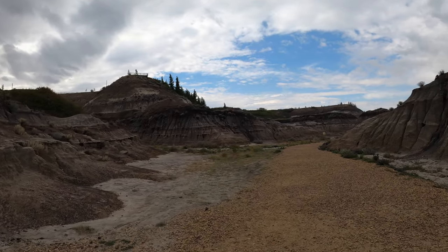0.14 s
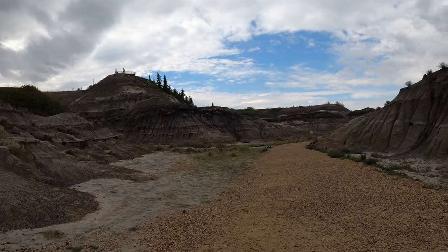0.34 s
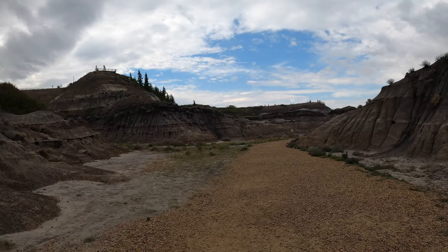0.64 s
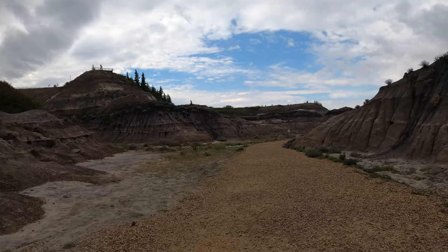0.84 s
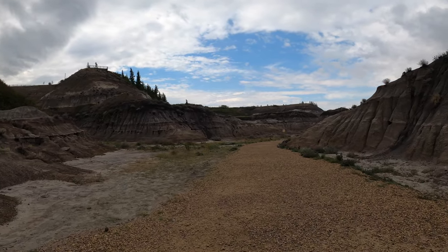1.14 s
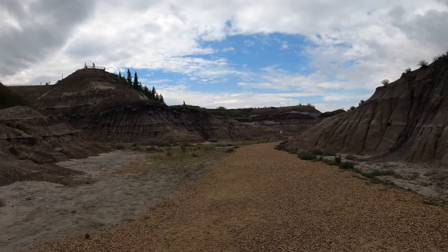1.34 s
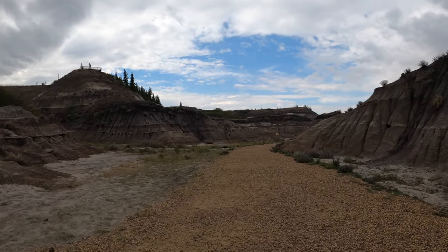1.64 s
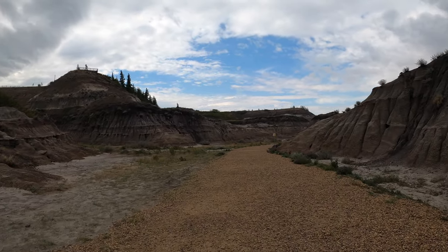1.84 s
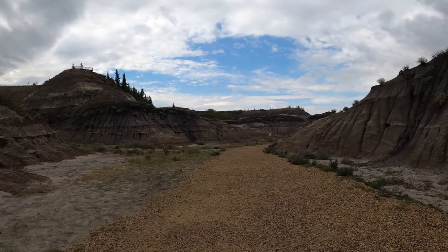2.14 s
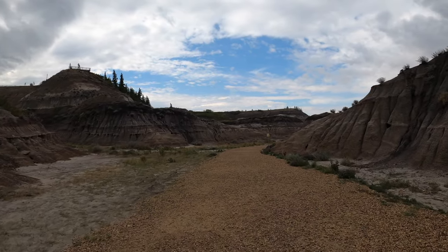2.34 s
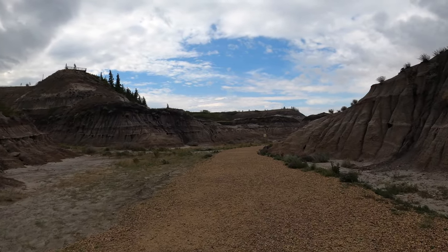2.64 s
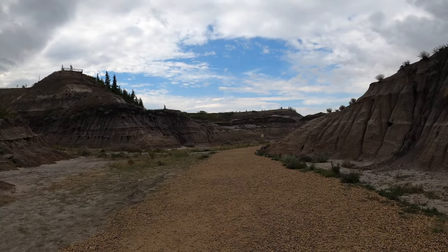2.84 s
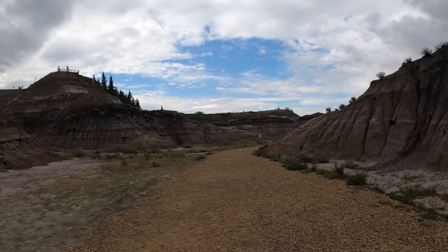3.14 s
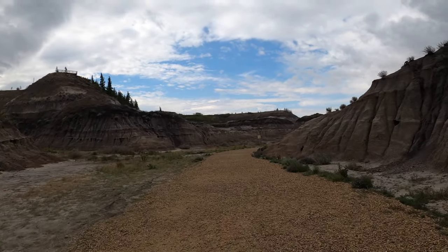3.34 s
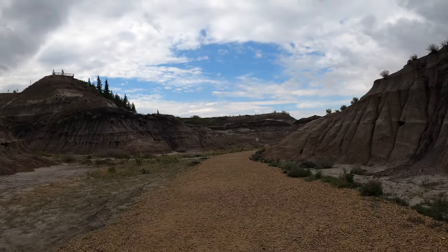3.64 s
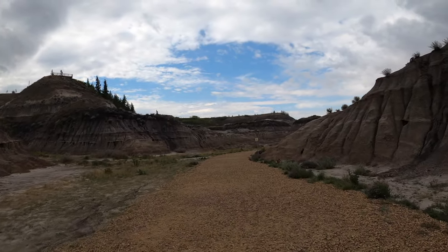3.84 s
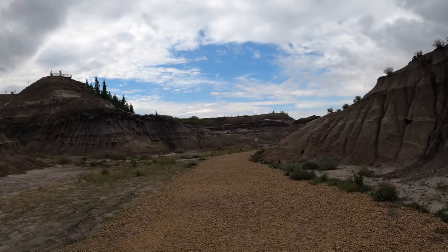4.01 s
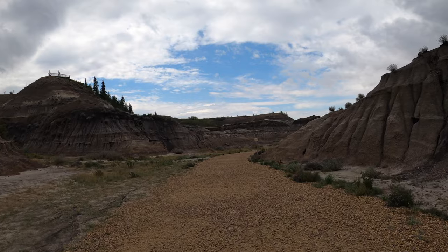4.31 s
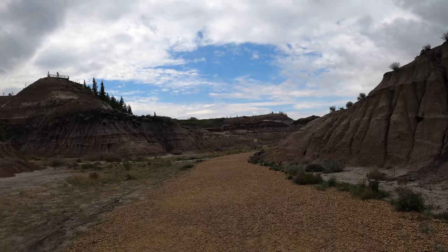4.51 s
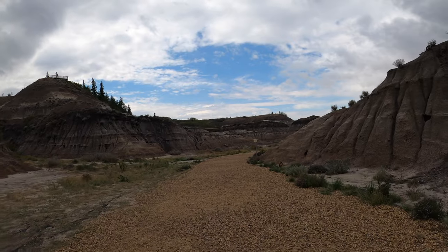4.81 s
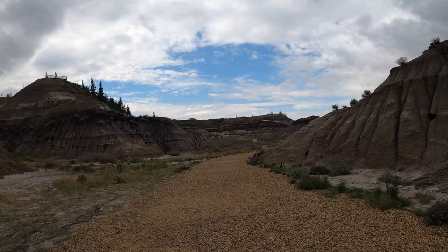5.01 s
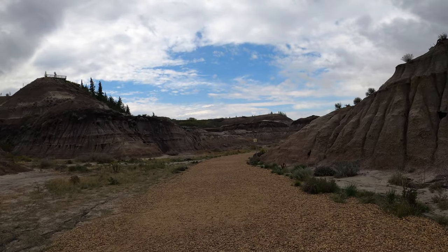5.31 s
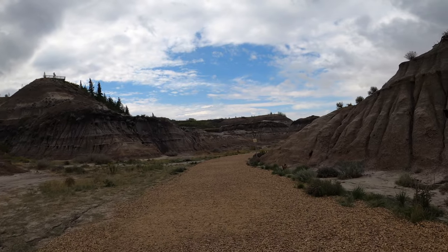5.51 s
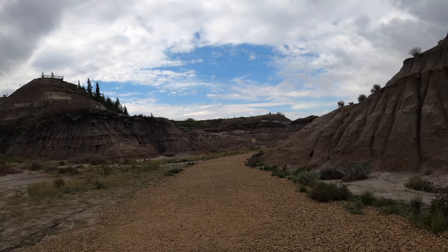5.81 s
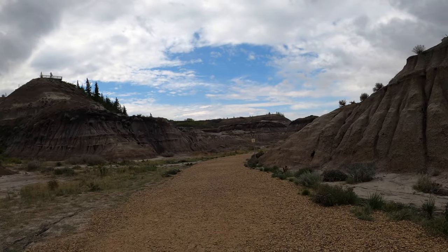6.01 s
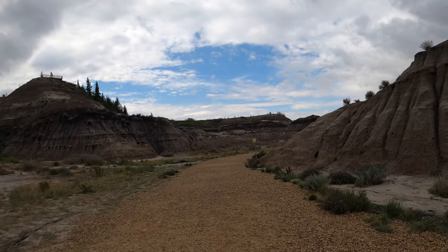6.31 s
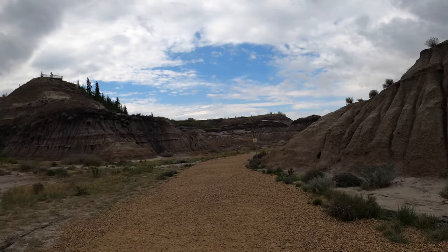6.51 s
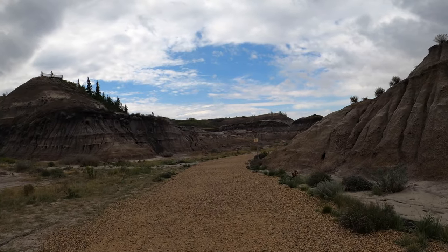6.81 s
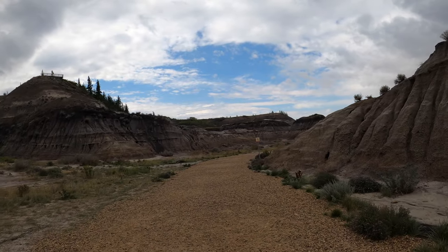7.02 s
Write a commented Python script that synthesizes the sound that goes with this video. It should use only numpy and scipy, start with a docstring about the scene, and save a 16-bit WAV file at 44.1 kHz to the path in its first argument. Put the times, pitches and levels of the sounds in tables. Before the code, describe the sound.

One walker treads a gravel path at an even pace, each step crisp and crunchy, over deep buffeting wind rumble and faint pebble ticks.

```python
"""Someone walks at a steady pace along a gravel trail in an open canyon, carrying the microphone.
From the start, wind noise rumbles in gusts on the microphone port and loose gravel ticks faintly.
Each step crushes the gravel (noise shaped by random touches) and stones snap (short damped knocks and cracks).
Between the steps the other sole scuffs off fine grit (swishing noise); later, hard chips clink (ringing tones).
There are no walls near enough to echo."""
import sys
import numpy as np
from scipy import signal
from scipy.io import wavfile
from scipy.ndimage import uniform_filter1d

SR = 44100
rng = np.random.default_rng(int(sys.argv[2]) if len(sys.argv) > 2 else 0)


def dump(signal):
    """Clip the signal to [-1, 1] and save it as 16-bit WAV at the path in sys.argv[1]."""
    limited = np.clip(np.atleast_2d(signal).T, -1, 1)
    pcm = np.round(limited * 32767).astype(np.int16)
    wavfile.write(sys.argv[1], SR, pcm)


N = 315756
TIME = np.arange(N) / SR

# footfalls, with relative levels: full_weight_s [s], fade_s [s], packed_ground_db [dB], pebbles_db [dB],
# grit_db [dB], loose_gravel_stir_db [dB]
FOOTFALLS = [(0.071, 0.075, -56, -36, -46.5, -59.5), (0.602, 0.07, -50, -38, -53, -62.5),
             (1.12, 0.044, -43.5, -31.5, -46.5, -60.5), (1.636, 0.042, -51, -36.5, -46, -56),
             (2.148, 0.038, -43.5, -33.5, -41, -57.5), (2.66, .11, -50.5, -38.5, -47.5, -60),
             (3.208, 0.037, -41, -27.5, -40, -58.5), (3.722, 0.033, -43, -30, -38, -55),
             (4.237, 0.053, -46.5, -32.5, -45.5, -60.5), (4.759, 0.051, -47, -36, -44.5, -58),
             (5.281, 0.048, -41, -34.5, -43.5, -55), (5.801, 0.031, -48.5, -34.5, -42.5, -58),
             (6.272, 0.067, -46, -36.5, -48, -58), (6.815, 0.055, -45, -32.5, -43, -54)]


def from_db(db):
    """Turn decibels into gain."""
    return 10 ** (np.asarray(db) / 20)


def rms_one(x):
    """Scale to unit power."""
    return x / np.sqrt(np.mean(x ** 2) + 1e-20)


def band(x, low, high, order=2):
    """Keep only the pitches between low and high, in Hz."""
    sos = signal.butter(order, [low, min(high, .45 * SR)], "band", fs=SR, output="sos")
    return signal.sosfilt(sos, x + 1e-18)


def hiss():
    """White noise."""
    return rng.standard_normal(N)


def drift(rate):
    """Wander in straight lines between random values, rate of them a second, with rms 1."""
    return rms_one(np.interp(TIME * rate, np.arange(N), rng.standard_normal(N)))


def swell(s, half_s, db):
    """Gain that peaks at time s and is 10 dB down half_s either side."""
    return from_db(db - 10 * np.minimum(((TIME - s) / half_s) ** 2, 20))


def steady(x, span_s):
    """Even out slow swells, keep the fine grain."""
    power = np.abs(uniform_filter1d(x ** 2, max(int(span_s * SR), 2)))
    return x / np.sqrt(power + 1e-12)


def coloured(excite, spectrum, low, high):
    """Add up half-octave bands, each with a fresh excitation and the spectrum's level; rms 1."""
    hz, db = np.transpose(spectrum)
    edges = np.geomspace(low, high, round(2 * np.log2(high / low)) + 1)
    middle_log_hz = np.log(edges[1:] * edges[:-1]) / 2
    gains = from_db(np.interp(middle_log_hz, np.log(hz), db))
    bands = (g * band(excite(), a, b, order=3) for g, a, b in zip(gains, edges, edges[1:]))
    return rms_one(sum(bands))


def touches(per_s, spread_db):
    """Stones touch at random, many lightly, a few hard."""
    sizes = from_db(spread_db * np.minimum(rng.exponential(1, N), 3.5))
    return steady(sizes * (rng.random(N) < per_s / SR), 0.039)


def contacts(per_s, spread_db, rub, own):
    """Some touches sound in every band, others only at their own stone's pitch, over a smooth rub."""
    shared = touches(per_s, spread_db)
    return lambda: (shared + own * touches(per_s / 2, spread_db) + rub) * hiss()


def wind():
    """Gusts strike the port, hold and ease off: eddies rumble, buffet and thud; faint air hiss lies behind."""
    # gusts on the port: start_s [s], end_s [s], rumble_db [dB], buffeting_db [dB], hollow_rush_db [dB]
    gust_rows = [(0.014, 0.244, -31.5, -42, -72), (0.374, 0.718, -27.5, -39, -74),
                 (0.84, 1.108, -32.5, -49, -78), (1.46, 1.756, -35, -50.5, -75),
                 (2.181, 2.55, -34, -48.5, -71), (3.325, 3.87, -27.5, -43, -63),
                 (3.985, 4.52, -37, -51, -74), (4.652, 5.512, -27, -40.5, -69),
                 (5.663, 5.786, -29, -47, -67), (6.134, 6.71, -30.5, -45.5, -60),
                 (6.79, 7.2, -31.5, -47, -65)]
    # breeze between gusts: rumble_db [dB], buffeting_db [dB], hollow_rush_db [dB]
    breeze_db = (-41.5, -54.5, -73)
    # single eddies thudding on the port: peak_s [s], level_db [dB]
    thud_rows = [(0.172, -31.5), (0.23, -33), (0.42, -32), (0.69, -34.5), (0.885, -32), (1.61, -39.5),
                 (2.21, -37), (2.875, -41.5), (3.55, -29), (5.1, -32.5), (5.235, -29.5), (5.477, -24.5),
                 (6.137, -30)]
    # colours of the rumble, the buffeting and the air hiss: pitch_hz [Hz], level_db [dB per Hz]
    rumble_colour = [(12, 4), (20, 1), (32, 3), (50, -2), (75, -6), (100, -11.5)]
    buffet_colour = [(80, 1), (110, 4.5), (160, -6.5), (220, -14.5), (300, -26), (420, -33.5)]
    air_colour = [(200, 16), (300, 5), (500, -3), (800, -5.5), (1300, 1.5), (2500, -6.5), (5000, -11.5),
                  (7500, -17), (10500, -22.5), (14000, -63)]
    attack_s, release_s = 0.02, 0.082  # to rise or fall by 10 dB
    thud_half_s = 0.019
    eddies_per_s, rumble_swing_db, buffet_swing_db = 24, 2, 4

    level_db = np.array(breeze_db)[:, None]
    for start, end, *peak_db in gust_rows:
        before = np.maximum(start - TIME, 0) / attack_s
        after = np.maximum(TIME - end, 0) / release_s
        gust_db = np.array(peak_db)[:, None] - 10 * (before + after)
        level_db = np.maximum(level_db, gust_db)
    rumble_db, buffet_db, rush_db = level_db

    eddies = drift(eddies_per_s)
    thuds = sum(swell(s, thud_half_s, db) for s, db in thud_rows)
    rumble_gain = from_db(rumble_db + rumble_swing_db * eddies)
    rumble = rumble_gain * steady(coloured(hiss, rumble_colour, 13, 94.57), 0.0696)
    buffet_gain = np.hypot(from_db(buffet_db + buffet_swing_db * eddies), thuds)
    buffet = buffet_gain * steady(coloured(hiss, buffet_colour, 86.6, 453), 0.0482)
    rush = from_db(rush_db) * rms_one(band(hiss(), 292, 525, order=3))
    air = from_db(-59.0) * coloured(hiss, air_colour, 177.4, 13300)
    return rumble + buffet + rush + air


def loose_gravel():
    """Small ticks come in uneven trickles as the foot rolls before and after each footfall."""
    # two stirs in every step: after_full_weight_s [s], half_length_s [s], level_db [dB above the step's stir]
    roll = [(-.12, 0.091, -2.5), (0.167, 0.12, 0.5)]
    # colour of the ticks: pitch_hz [Hz], level_db [dB per Hz]
    tick_colour = [(300, -2.5), (600, -3), (850, -7), (1300, 2.5), (1900, -1.5), (2900, -8), (4000, -14.5),
                   (6000, -19), (9000, -29), (12000, -62)]
    resting_db, trickle_swing_db, trickles_per_s = -68, 3, 28

    stir_power = sum(swell(s + lag, half, stir_db + db) ** 2
                     for s, *_, stir_db in FOOTFALLS for lag, half, db in roll)
    ticks = coloured(contacts(per_s=300, spread_db=2.5, rub=.25, own=1.36), tick_colour, 273, 12600)
    trickle = from_db(trickle_swing_db * drift(trickles_per_s))
    return np.sqrt(stir_power + from_db(resting_db) ** 2) * trickle * ticks


def footsteps():
    """Weight builds and eases; fine grit gives way first, then pebbles and the packed ground."""
    # colour of the crunch: pitch_hz [Hz], level_db [dB per Hz]
    crunch_colour = [(200, -3.5), (400, -4.5), (600, -7), (850, -8.5), (1150, -6), (1500, -10.5),
                     (2100, -7), (2900, -5), (5000, -22), (7000, -27), (8700, -28.5), (11000, -43),
                     (14500, -48)]
    build_s = 0.034  # the weight comes onto the foot: the last 10 dB of the rise

    coarse = contacts(per_s=500, spread_db=4.5, rub=0.16, own=0.9)
    fine = contacts(per_s=700, spread_db=7.5, rub=0.53, own=0.92)
    ground = from_db(2.5) * coloured(coarse, crunch_colour, 168.3, 797)
    pebbles = from_db(-6.0) * coloured(coarse, crunch_colour, 816, 1940)
    grit = from_db(-3.5) * coloured(fine, crunch_colour, 2120, 15800)
    out = np.zeros(N)
    for s, fade, ground_db, pebble_db, grit_db, _ in FOOTFALLS:
        near = np.abs(TIME - s) < .25
        for layer, db, lead_s in [(ground, ground_db, 0), (pebbles, pebble_db, 0), (grit, grit_db, .004)]:
            t = TIME[near] - s + lead_s
            weight_db = -10 * np.abs(t / np.where(t < 0, build_s, fade)) ** 1.5
            out[near] += from_db(db + weight_db) * layer[near]
    return out


def slips():
    """Lesser stones give way at random moments around each footfall: rows like those in stones()."""
    per_step = 7
    lag_s, scatter_s = .006, .055
    knock_db, crack_db, spread_db = 3.5, -1, 3  # knock and crack relative to the step's pebbles
    middle_hz, spread_octaves = 1345, 0.26

    steps = [(step[0], step[3]) for step in FOOTFALLS]
    s, pebble_db = np.repeat(steps, per_step, axis=0).T
    when, knock, size, crack = rng.standard_normal((len(s), 4)).T
    slip_s = np.clip(s + lag_s + scatter_s * np.tanh(when), FOOTFALLS[0][0] / 2, TIME[-1])
    return list(zip(slip_s,
                    pebble_db + knock_db + spread_db * knock,
                    middle_hz * 2 ** (spread_octaves * size),
                    pebble_db + crack_db + spread_db * crack))


def stones():
    """A stone grinds briefly, then slips: a crack and a knock of two or three cycles, damped by the gravel bed."""
    # single stones snapping, with relative levels: slip_s [s], knock_db [dB], knock_hz [Hz], crack_db [dB]
    snap_rows = [(0.0659, -15, 1040, -32), (0.0772, -19, 1120, -50), (0.1665, -22, 1530, -55),
                 (0.5778, -31, 1600, -27), (0.7116, -31, 1640, -50), (1.0842, -24.5, 990, -40),
                 (1.1178, -16, 1140, -45), (1.2272, -26, 1210, -33.5), (1.3305, -29, 1190, -55),
                 (1.6116, -26, 1530, -26.5), (1.648, -17.5, 1420, -50), (1.6942, -22.5, 1410, -48),
                 (1.7477, -21.5, 1320, -36), (1.7739, -22.5, 1350, -50), (1.9846, -27, 1410, -55),
                 (2.124, -16, 860, -31), (2.1485, -17.5, 880, -27), (2.2973, -30, 1220, -43),
                 (2.7552, -24, 1290, -41), (3.0267, -26, 1590, -55), (3.0894, -23, 1860, -30),
                 (3.1, -41, 2070, -32), (3.1708, -24, 1430, -34), (3.2093, -6, 930, -24),
                 (3.217, -5.5, 1170, -34), (3.2404, -1, 1120, -38), (3.2474, -9, 1040, -43),
                 (3.4877, -29, 1010, -55), (3.844, -24, 1280, -55), (4.0515, -26, 1480, -47),
                 (4.231, -18, 1280, -42), (4.243, -14, 1610, -44), (4.5912, -32, 1800, -43),
                 (4.7612, -17.5, 1460, -21), (5.0525, -26.5, 1820, -32), (5.108, -12, 1700, -27.5),
                 (5.2611, -19.5, 1240, -39), (5.2809, -20, 1140, -21.5), (5.7946, -15, 1360, -45),
                 (5.8142, -14.5, 1160, -28), (6.7135, -47, 1390, -28), (6.8389, -14, 1400, -43),
                 (6.8661, -8, 1210, -27.5), (6.8836, -17, 1290, -31)]

    out = np.zeros(N + SR)
    t = np.arange(-400, 800) / SR
    for s, knock_db, hz, crack_db in [*snap_rows, *slips()]:
        chatter, size = rng.standard_normal((2, len(t))), rng.standard_normal()
        jostle = np.exp(-np.abs(t) / np.where(t < 0, .0025, .004))  # neighbours rub before and after the slip

        cycles = hz * t[t >= 0]
        ring = cycles ** 2 * np.exp(-cycles / .36) * np.cos(2 * np.pi * cycles)
        strike = (t == 0) + 0.032 * chatter[0] * jostle
        knock = band(np.convolve(strike, ring)[:len(t)], 290, 8100)

        crack_hz = 3600 * np.exp(0.13 * size)
        burst = chatter[1] * (np.exp(-np.abs(t - .0003) / 0.0003) + 0.35 * jostle)
        crack = band(burst, crack_hz * .6, crack_hz * 1.5, order=3)

        at = int((s + t[0]) * SR)
        out[at:at + len(t)] += from_db(knock_db - 3.5) * knock / np.abs(knock).max()
        out[at:at + len(t)] += from_db(crack_db - 8.0) * crack / np.abs(crack).max()
    return out[:N]


def scuffs():
    """The sole slides over fine grit: a short swish, with a bright rasp pitched a little differently each time."""
    # a sole scuffing as it pushes off or skids: peak_s [s], relative level_db [dB], rasp_hz [Hz]
    scuff_rows = [(0.256, -51, 4800), (0.764, -48.5, 5240), (1.322, -58, 6800), (1.806, -49.5, 6250),
                  (2.344, -48, 4200), (2.833, -52, 4670), (3.383, -48, 4700), (3.711, -42, 5200),
                  (3.882, -52.5, 5570), (4.417, -50.5, 4600), (4.915, -53, 4300), (5.456, -53.5, 5500),
                  (5.946, -49, 4500), (6.486, -46, 4900), (6.987, -49, 5300)]
    # colour of the swish: pitch_hz [Hz], level_db [dB per Hz]
    swish_colour = [(700, 7), (1400, 8.5), (2500, 2.5), (4000, 6.5), (5300, -0.5), (7000, -4),
                    (8700, -10.5), (11000, -29), (14000, -27)]
    half_s = 0.024  # 10 dB below the peak this long before and after it
    rasp_quality, rasp_db = 3.4, -6  # narrowness of the rasp; its level against the swish

    swish = coloured(contacts(per_s=4600, spread_db=4.0, rub=0.81, own=1.0), swish_colour, 730, 14350)
    out = np.zeros(N)
    for s, db, hz in scuff_rows:
        near = np.abs(TIME - s) < .2
        low, high = hz * (1 - .5 / rasp_quality), hz * (1 + .5 / rasp_quality)
        rasp = rms_one(band(rng.standard_normal(near.sum()), low, high))
        gain = from_db(db - 1.1 - 10 * np.abs(TIME[near] - s) / half_s)
        out[near] += gain * (swish[near] + from_db(rasp_db) * rasp)
    return out


def chips():
    """Hard chips scrape clear of the bed and clink thinly, each with its own mix of the modes."""
    # chips clinking: clink_s [s], relative peak_db [dB], ring_s [s to fall by 60 dB]
    clink_rows = [(1.249, -37.5, 0.037), (3.158, -39, 0.039), (3.171, -38, 0.018), (3.74, -43, .015),
                  (5.283, -40.5, 0.066), (5.468, -42.5, 0.058), (5.5925, -38, 0.0074), (6.682, -47, .012),
                  (6.911, -48, .008)]
    # what a chip rings with, before each chip's random changes: pitch_hz [Hz], level_db [dB]
    mode_rows = [(6600, 11), (8500, 17), (9900, -23), (11400, -29), (13000, -15)]

    out = np.zeros(N + SR)
    t = np.arange(-512, 4096) / SR
    hz, mode_db = np.transpose(mode_rows)
    for s, db, t60 in clink_rows:
        detune, strength, phase = rng.standard_normal((3, len(hz)))
        turns = np.outer(hz * np.exp(0.025 * detune), t) + phase[:, None]
        modes = from_db(mode_db + 3 * strength) @ np.sin(2 * np.pi * turns)
        scratch = band(rng.standard_normal(len(t)), 4600, 9000, order=2)
        fall_db = np.where(t < 0, -t * 5500, 60 * t / max(t60, .002))
        clink = (.6 * rms_one(modes) + rms_one(scratch)) * from_db(-fall_db)
        at = int((s + t[0]) * SR)
        out[at:at + len(t)] += from_db(db - 5.5) * clink / np.abs(clink).max()
    return out[:N]


def scene():
    """Wind and feet at one microphone."""
    return (wind() + loose_gravel() + footsteps() + stones() + scuffs() + chips())[None]


def record(dry):
    """The microphone port and housing weaken three pitch regions one after another; the top is cut."""
    # dips of the port and housing: pitch_hz [Hz], quality [narrowness], level_db [dB]
    port_rows = [(870, 5.1, -1.5), (1280, 15, -0.5), (1760, 2.5, -3.5)]
    cutoff_hz = 15300  # 70 dB down from here up
    for hz, quality, db in port_rows:
        dry = dry + (from_db(db) - 1) * signal.lfilter(*signal.iirpeak(hz, quality, fs=SR), dry)
    return signal.sosfilt(signal.cheby2(12, 70, cutoff_hz, fs=SR, output="sos"), dry)


dry = scene()
out = record(dry)
dump(out)
```